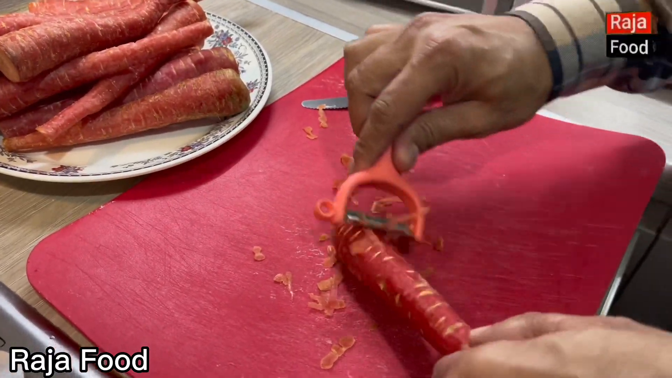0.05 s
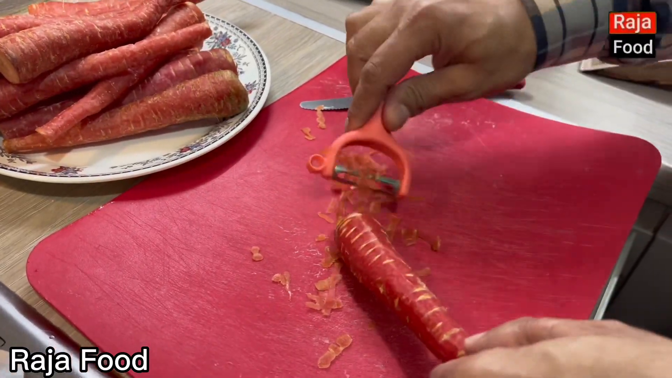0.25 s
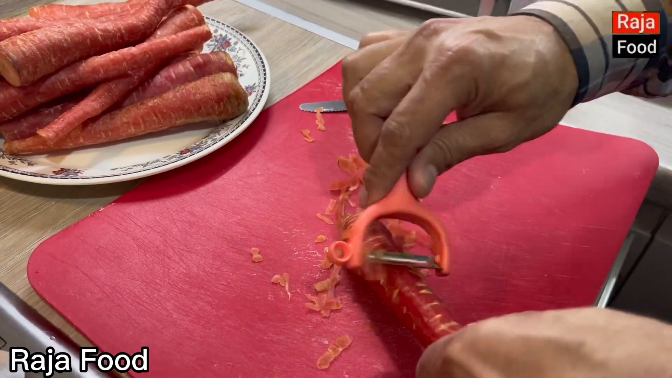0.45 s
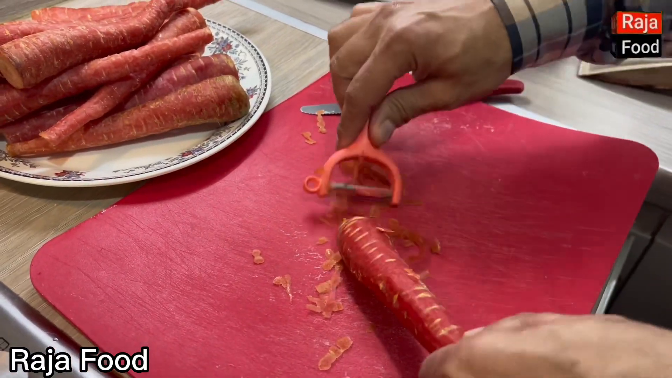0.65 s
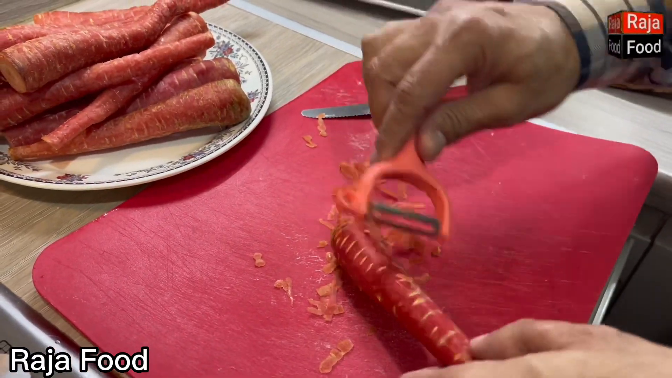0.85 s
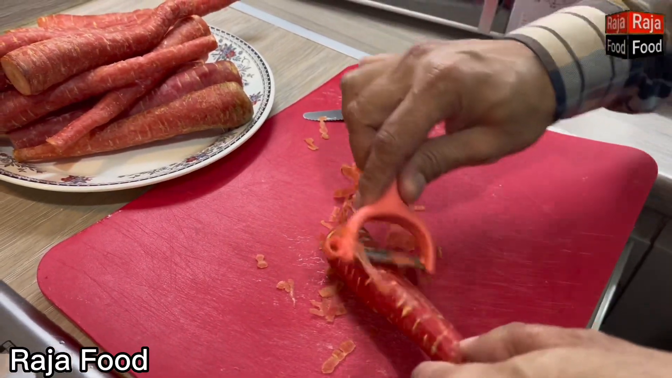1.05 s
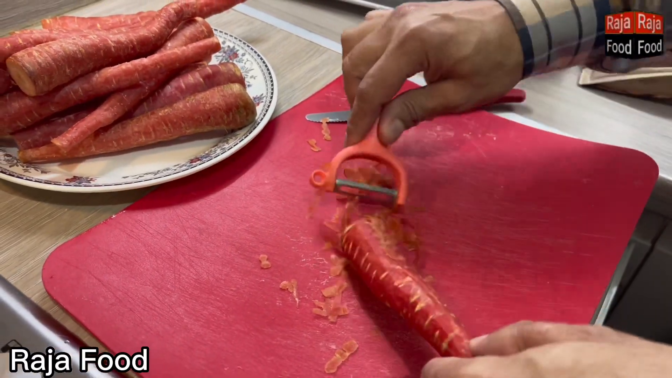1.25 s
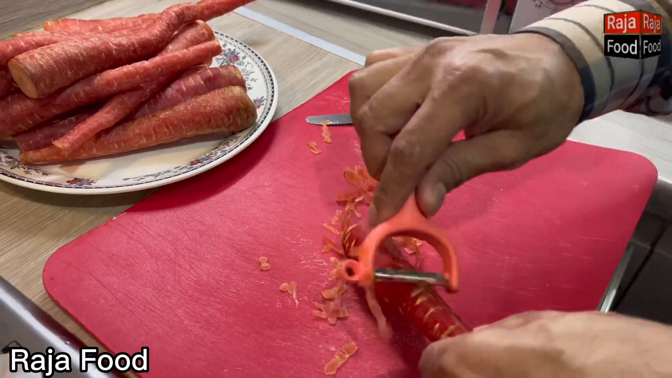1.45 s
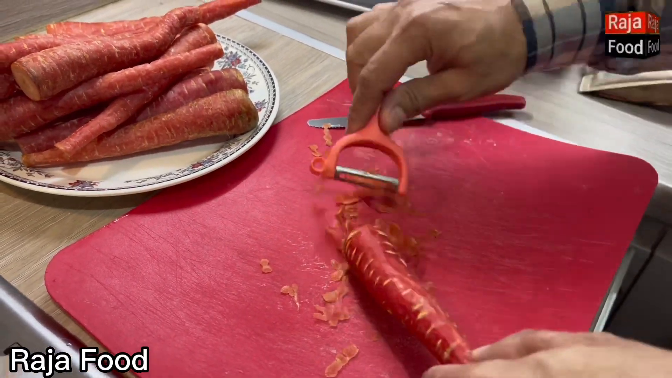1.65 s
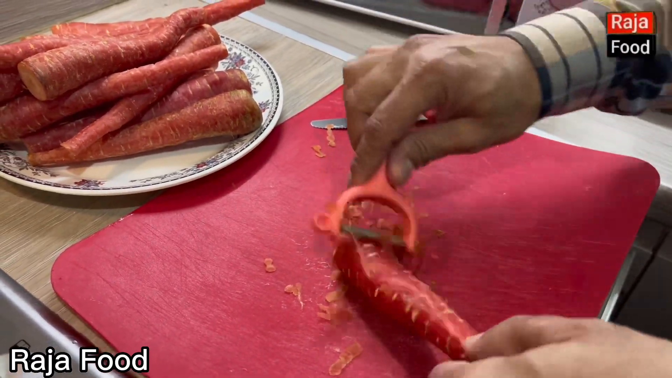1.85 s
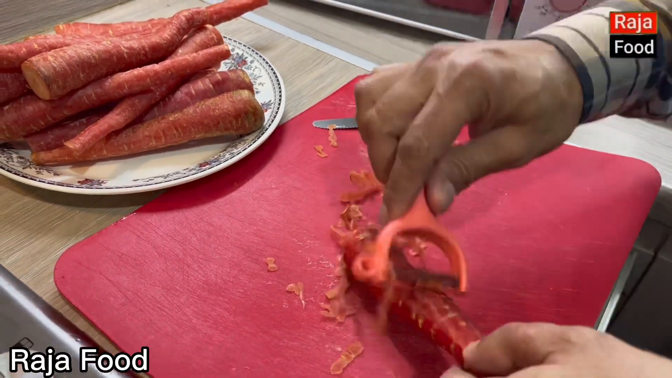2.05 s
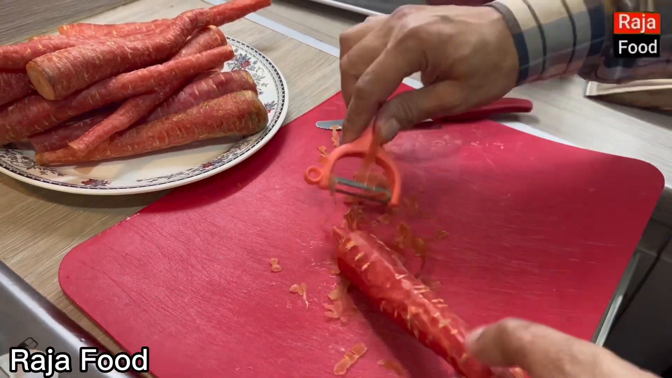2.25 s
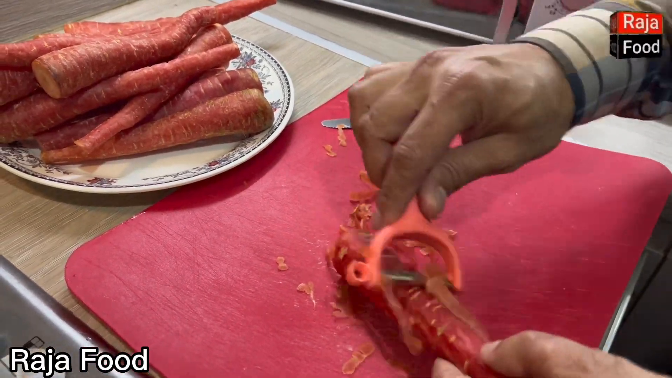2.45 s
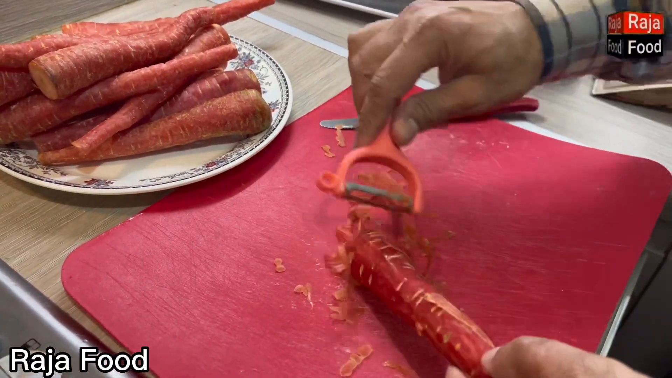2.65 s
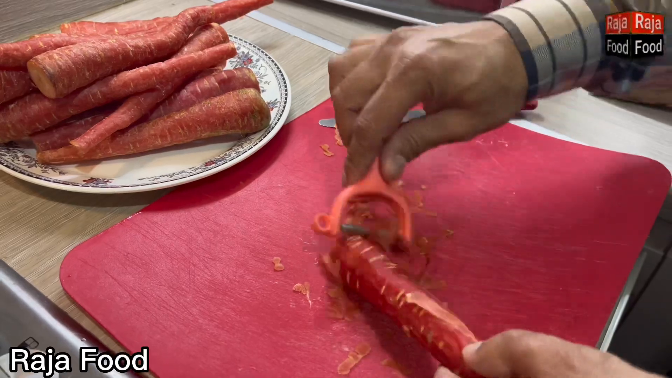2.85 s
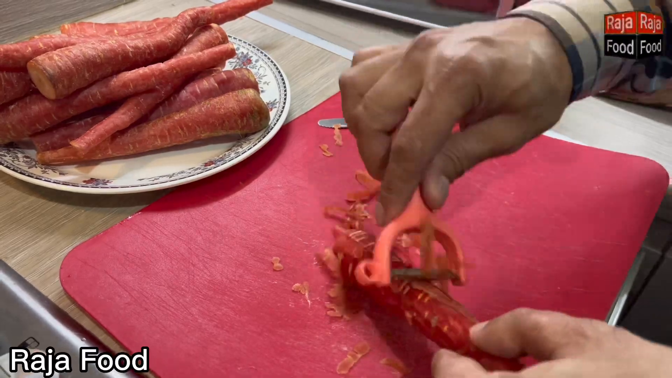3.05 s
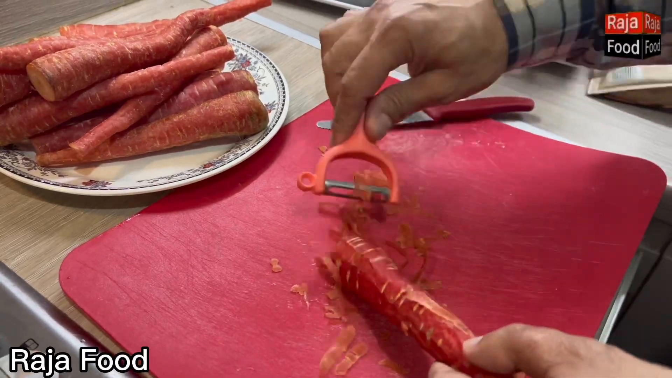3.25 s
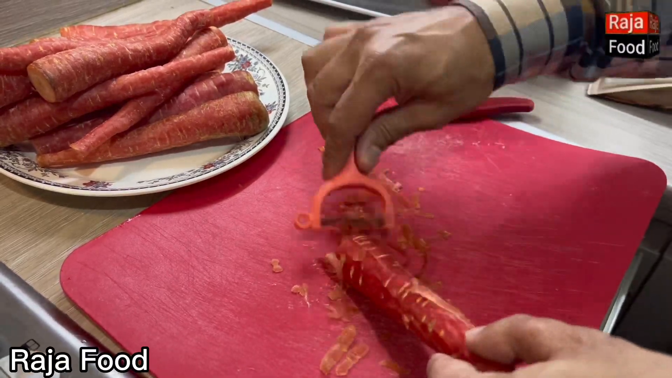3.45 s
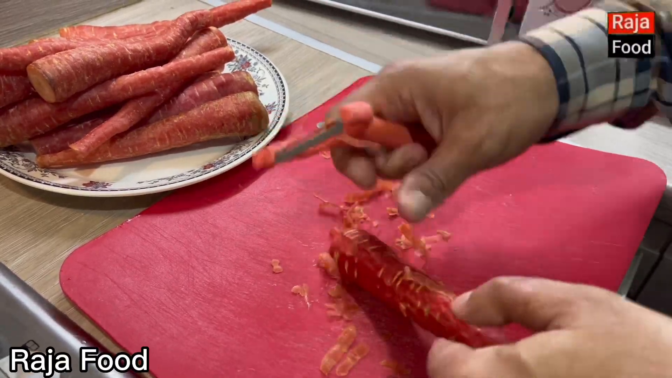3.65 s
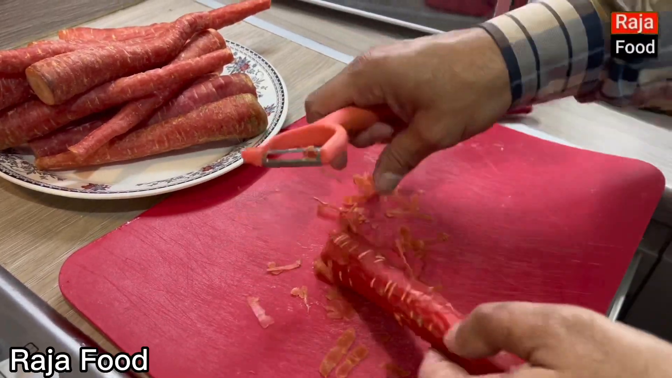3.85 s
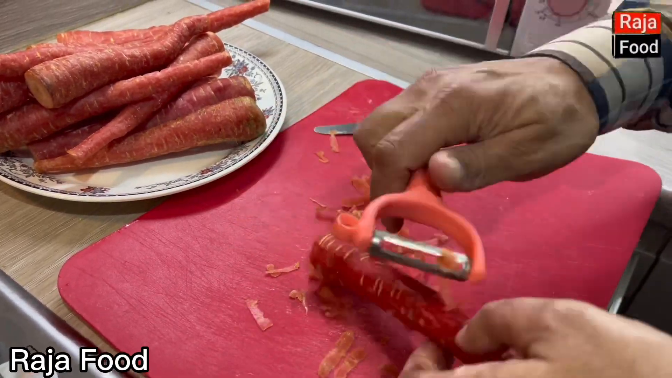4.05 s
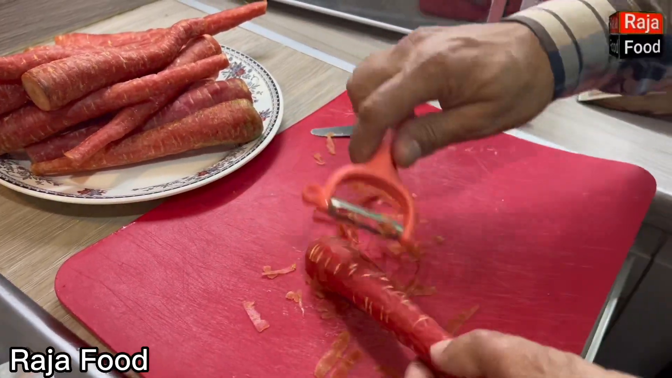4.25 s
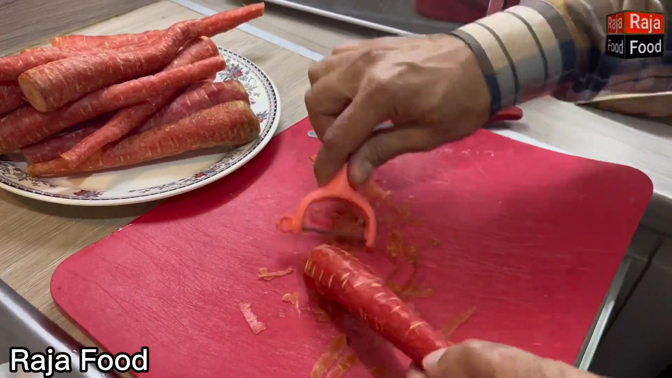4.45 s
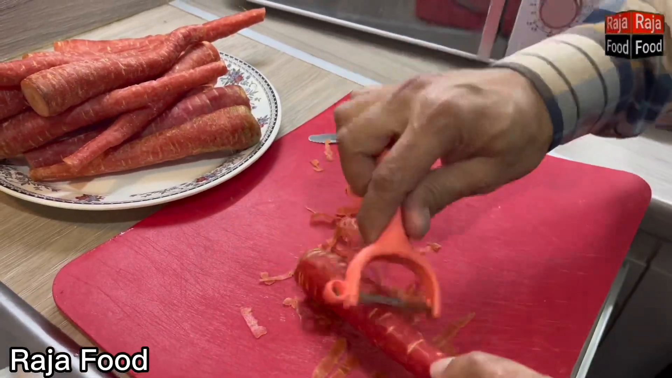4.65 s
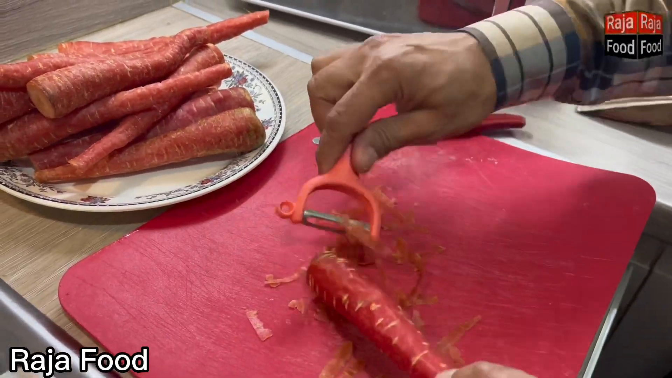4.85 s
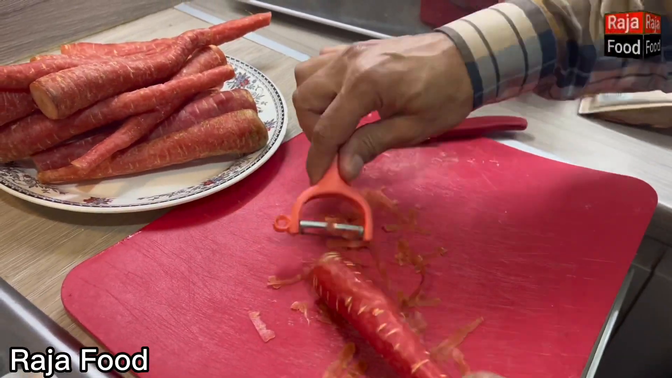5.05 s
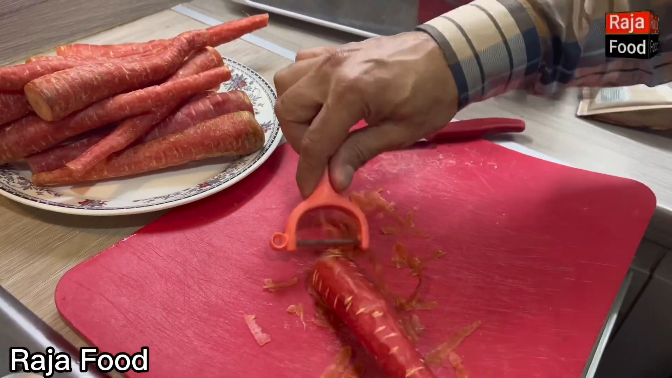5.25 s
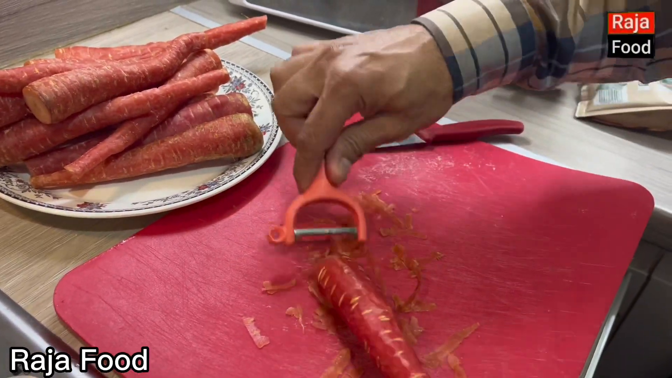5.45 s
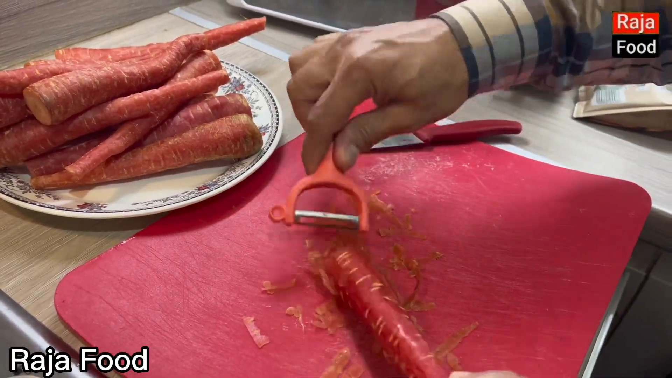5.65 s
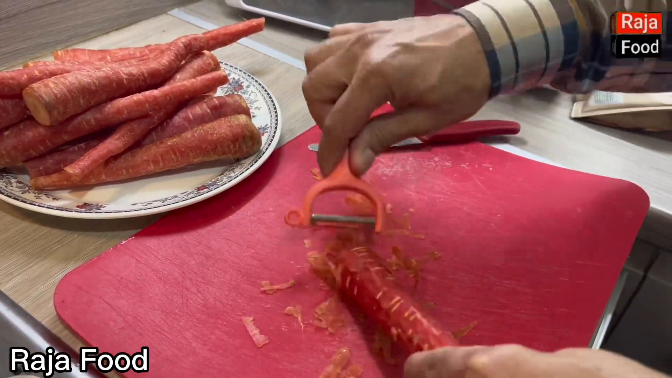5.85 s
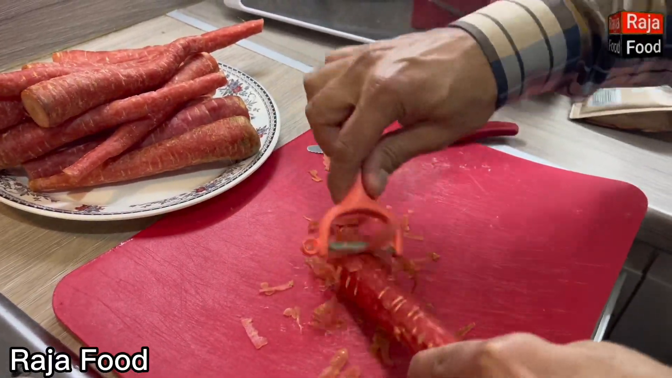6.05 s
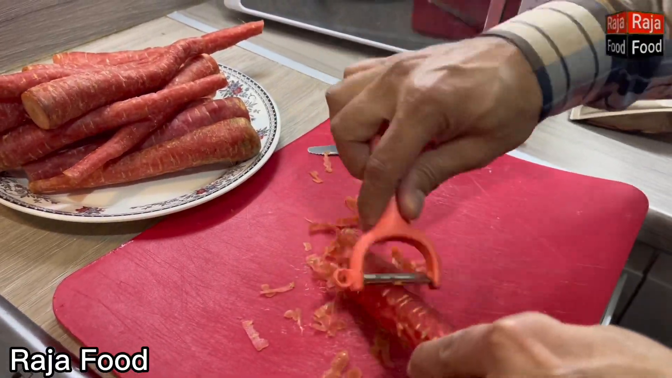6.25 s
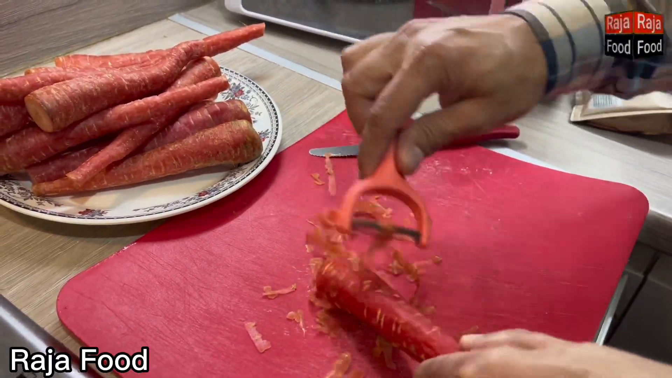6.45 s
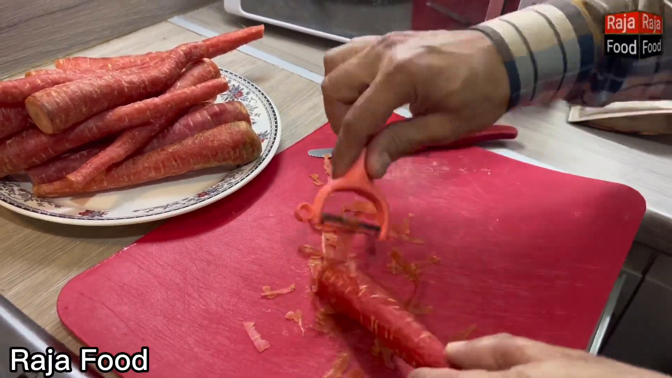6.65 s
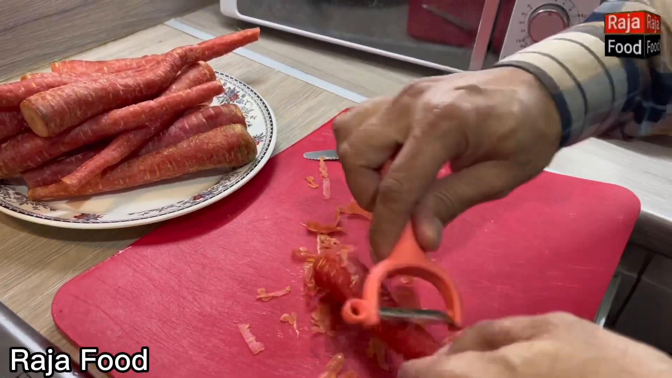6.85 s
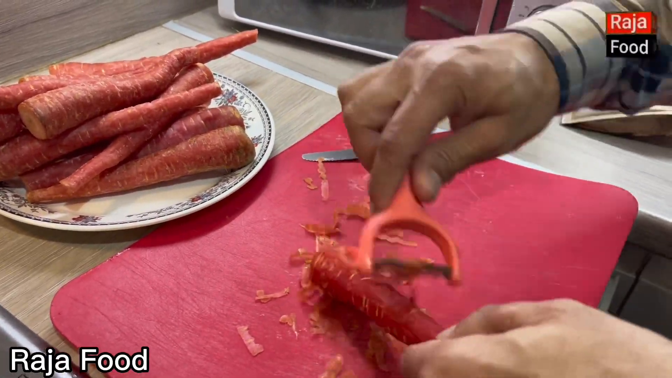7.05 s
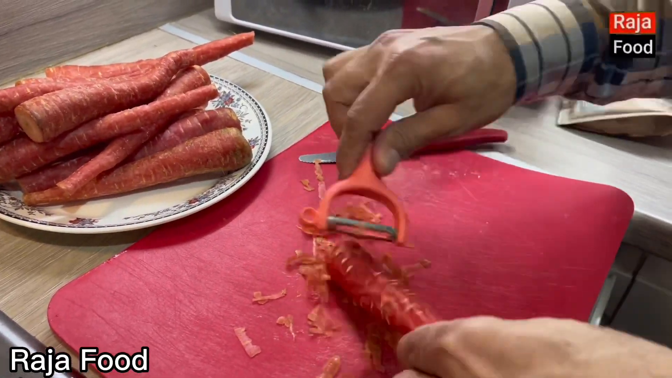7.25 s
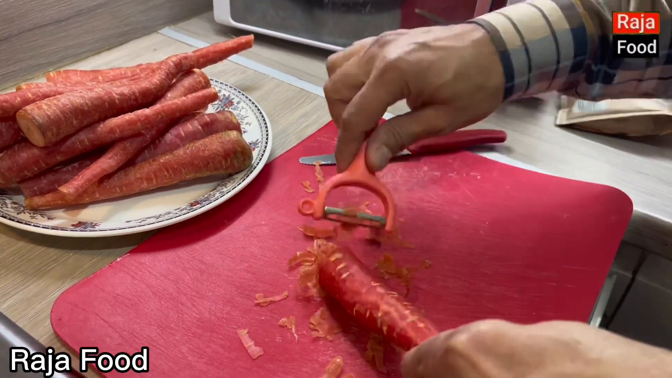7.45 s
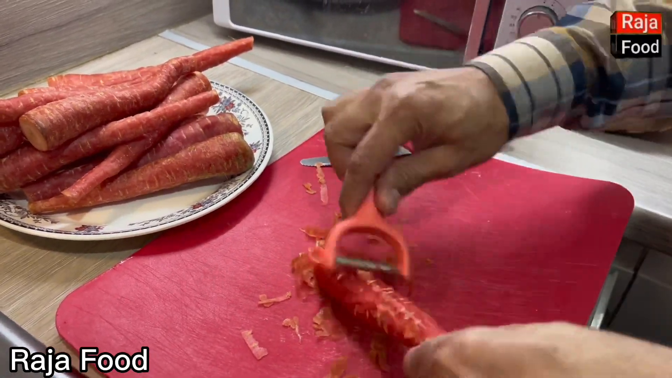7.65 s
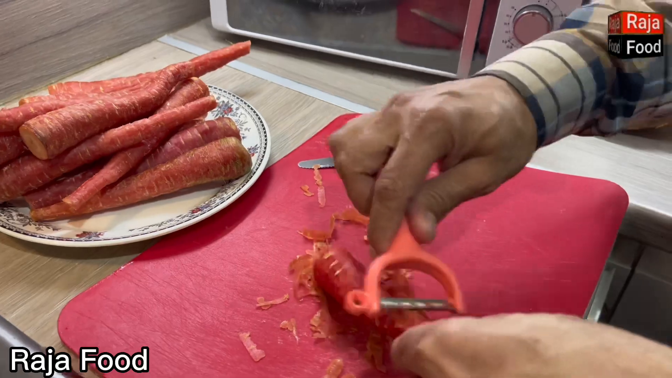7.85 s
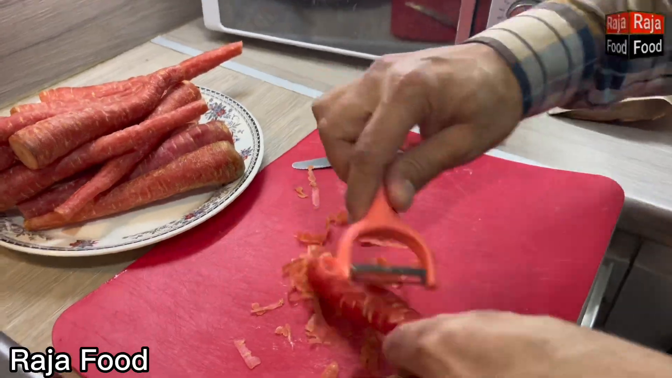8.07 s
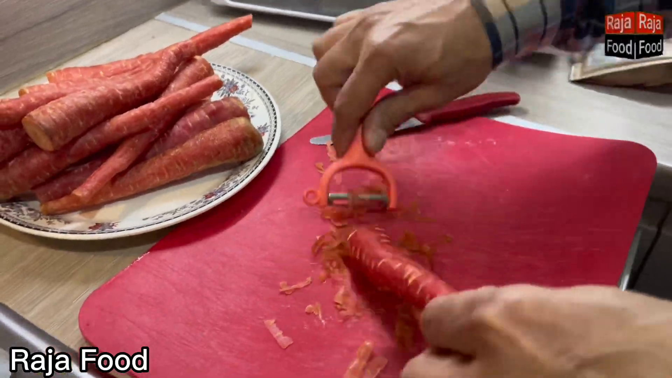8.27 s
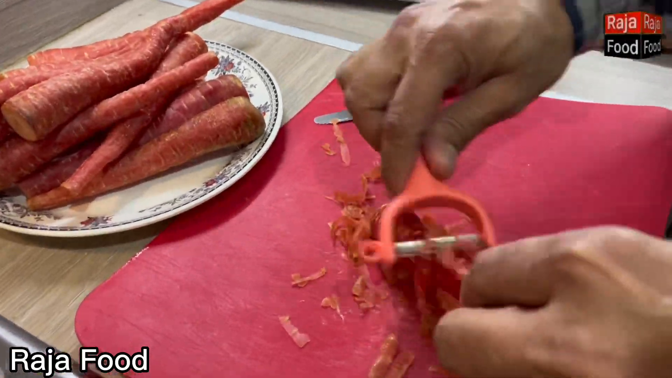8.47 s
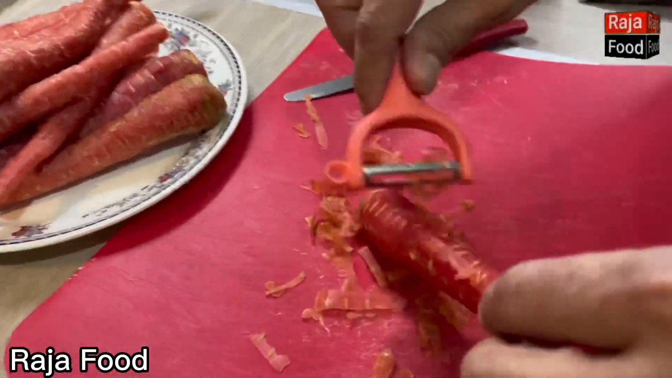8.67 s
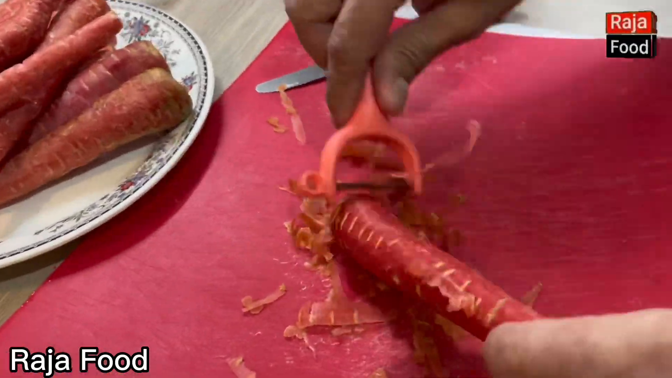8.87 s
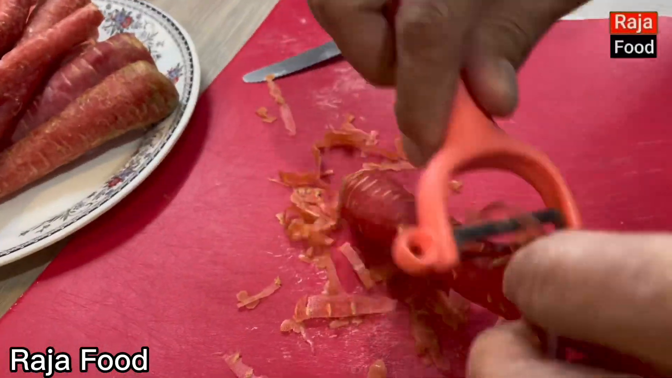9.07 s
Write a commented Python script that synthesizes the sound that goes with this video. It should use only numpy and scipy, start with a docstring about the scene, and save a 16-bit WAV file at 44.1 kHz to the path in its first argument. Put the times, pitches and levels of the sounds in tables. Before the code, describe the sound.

Close, crisp carrot peeling: short tearing scrapes, sharp blade clicks and low board thumps, pausing briefly midway, over faint unsteady room noise.

```python
"""A swivel peeler strips a carrot whose tip rests on a plastic cutting mat, close to a two-port phone in a kitchen.
Each stroke is noise shaped in loudness and colour: the blade bites, then tears through wet fibres.
Touches and flicks crack and ring the blade; the board hums, knocks and bumps under the carrot.
A small hard room adds short reflections. Behind it lies unsteady noise, with a low rumble at first.
Everything falls silent once, very briefly."""
import sys
import numpy as np
from scipy import signal
from scipy.fft import rfft, irfft, next_fast_len
from scipy.io import wavfile
from scipy.ndimage import uniform_filter1d

SR = 44100
rng = np.random.default_rng(int(sys.argv[2]) if len(sys.argv) > 2 else 0)


def waveform_to_disk(signal):
    """Save audio, clipped to [-1, 1], as 16-bit WAV at the path in sys.argv[1]."""
    frames = np.transpose(np.atleast_2d(signal))
    scaled = np.clip(frames, -1, 1) * 32767
    samples = np.round(scaled).astype(np.int16)
    wavfile.write(sys.argv[1], SR, samples)


N = 401971
T = np.arange(N) / SR  # time of every sample, s
SIZE = next_fast_len(N)
HZ = np.maximum(np.arange(SIZE // 2 + 1) * SR / SIZE, 1)  # every frequency of the spectrum


def undb(db):
    """Turn dB into a gain."""
    return 10 ** (np.asarray(db) / 20)


def unit(x):
    """Scale to an average strength (rms) of 1."""
    return x / np.sqrt(np.mean(x ** 2))


def across(table):
    """Read a (frequency [Hz], value) table at every frequency, on a logarithmic scale."""
    hz, value = np.transpose(table)
    return np.interp(np.log(HZ), np.log(hz), value)


def modes(table):
    """Add up damped resonators, every second one turned upside down."""
    total = 0
    for k, (hz, width_hz, db) in enumerate(table):
        detuning = (HZ ** 2 - hz ** 2) / (HZ * width_hz)
        total = total + (-1) ** k * undb(db) / (1 + 1j * detuning)
    return total


def through(x, response):
    """Filter a sound; white noise of rms 1 keeps rms 1."""
    filtered = irfft(rfft(x, SIZE) * response, SIZE)[..., :N]
    return filtered / np.sqrt(np.mean(np.abs(response) ** 2))


def walk(rate):
    """Glide between random levels, `rate` of them per second; spread 1."""
    step = int(SR / rate)
    levels = np.repeat(rng.standard_normal(N // step + 1), step)
    return unit(uniform_filter1d(levels, step)[:N])


def patches(shape, bins, frames):
    """Smooth random hills over frequency and time; spread 1."""
    hills = uniform_filter1d(rng.standard_normal(shape), bins, axis=0)
    return unit(uniform_filter1d(hills, frames, axis=1))


def shifting(x, broad_db, fine_db):
    """Let the colour wander: broad bands drift, narrow ones come and go."""
    spectra = signal.stft(x, nperseg=512, noverlap=384)[2]
    shape = spectra.shape[1:]
    gain = undb(broad_db * patches(shape, 25, 13) + fine_db * patches(shape, 2, 12))
    return signal.istft(spectra * unit(gain), nperseg=512, noverlap=384)[1][:, :N]


def grit(scatter_db, patchy_db, rate):
    """Dense snaps of uneven size, in patches as of stick and slip: one common set, then one per port."""
    size_db = scatter_db * rng.exponential(1, N) + patchy_db * walk(rate)
    return unit(rng.standard_normal((3, N)) * undb(size_db))


def blows(times, dbs, t60s, rises_s):
    """Add up the loudness of blows: a quick swell, then a fall of 60 dB in t60 seconds."""
    out = np.zeros(N)
    for s, db, t60, rise_s in zip(*np.broadcast_arrays(times, dbs, t60s, rises_s)):
        span = slice(max(int((s - 6 * rise_s) * SR), 0), int((s + 1) * SR))
        t = T[span] - s
        out[span] += undb(db - 60 * np.maximum(t, 0) / t60) / (1 + np.exp(-t / rise_s))
    return out


def slopes(t, rise_db_s, fall_db_s, hold_s=0):
    """A steady climb in dB to a peak at t = 0, a hold, a steady fall."""
    return rise_db_s * np.minimum(t, 0) - fall_db_s * np.maximum(t - hold_s, 0)


# How far the left port runs ahead: (frequency [Hz], phase lead [radians])
LEFT_LEAD = [(0, 0), (860, 0.9), (2580, 8.7), (5770, 18.0), (6370, 19.1), (8700, 18.8), (9820, 15.9),
             (10400, 15.7), (11800, 12.6), (12700, 12.6), (13400, 9.5), (14000, 9.6), (14700, 6.3),
             (15700, 6.3)]
# How much louder the left port is: (frequency [Hz], left minus right [dB])
LEFT_BALANCE = [(60, -21.5), (110, 3.5), (200, -9.5), (380, -8), (700, 6), (1290, -0.5), (2380, -5.5),
                (4400, -3), (8120, -1), (15000, 1.5)]
# Sound that reaches each port by its own path: (frequency [Hz], share [0-1])
OWN_PATH = [(300, 0.5), (1500, 0.75), (3000, 1), (6000, 0.65), (9000, 0.85), (12000, 0.2)]


def ports(x):
    """Both ports hear a common part with a lag and a balance, plus a part of their own treated alike."""
    lead = np.interp(HZ, *np.transpose(LEFT_LEAD))
    left = undb(across(LEFT_BALANCE) / 2) * np.exp(.5j * lead)  # the right port gets the opposite half
    own = across(OWN_PATH)
    spectra = rfft(x, SIZE)
    mixed = np.sqrt(1 - own ** 2) * spectra[0] + own * spectra[1:]
    return irfft(mixed * np.array([left, 1 / left]), SIZE)[:, :N]


ROOM_T60_S, ROOM_DB = 0.11, -9


def heard(envelope, response, snaps):
    """A source straight into the ports, plus wall reflections as smooth noise that dies away."""
    fall = undb(-120 / ROOM_T60_S / SR)  # acts on energy, so 60 dB in ROOM_T60_S
    energy = signal.lfilter([1 - fall], [1, -fall], envelope ** 2)
    wet = undb(ROOM_DB) * np.sqrt(energy)
    direct = ports(through(envelope * snaps, response))
    return direct + through(wet * rng.standard_normal((2, N)), response)


# Colour of the steady background: (frequency [Hz], relative level [dB per Hz])
AIR_COLOUR = [(15, -35), (25, 7), (81, 14), (250, 0), (928, -3), (2130, -9), (6190, -17), (9890, -20),
              (11300, -21), (12500, -26), (16200, -56.5), (22000, -120)]
AIR_DB, RUMBLE_DB, RUMBLE_STOP_S = -75.5, -68, 1.5


def kitchen():
    """Unsteady air and appliance noise, with a low resonant rumble that stops early on."""
    shared, own = rng.standard_normal((2, N)), rng.standard_normal((2, 2, N))
    air, low = .8 * shared[:, None] + .6 * own  # partly alike on the left and right
    air = shifting(through(air, undb(across(AIR_COLOUR))), 3.4, 3.3)
    air = undb(AIR_DB + 3.0 * walk(13)) * air
    low = through(low, modes([(78.4, 23, -2), (490, 760, -22.0)]))  # (Hz, width Hz, dB)
    rumble = undb(RUMBLE_DB + 3.5 * walk(12)) * low * (T < RUMBLE_STOP_S)
    return air + rumble


# Knocks and scuffs of the carrot on the board: (time [s], level [dB], swell [ms])
CARROT_KNOCKS = [(0.12, -34, 1.8), (0.622, -36, 0.84), (1.598, -24.5, 3), (1.927, -46.5, 1.2),
                 (2.222, -36, 3.7), (2.581, -29.5, 0.25), (3.564, -67, 3), (4.08, -60.5, 4),
                 (4.499, -45, 5), (4.802, -43.5, 1.1), (4.915, -60, 0.88), (5.304, -61, 4.2),
                 (6.5, -55, 2.4), (6.752, -63, 3.8), (7.182, -62, 3), (7.299, -53.5, 4.5),
                 (7.376, -49, 2.5), (7.539, -54.5, 3.5), (7.939, -52, 4), (8.616, -46.5, 5.4),
                 (8.822, -48.5, 2.7)]
# Dull bumps as the hand shifts the carrot: (time [s], level [dB])
HAND_BUMPS = [(1.699, -62.5), (2.017, -56), (2.707, -66), (3.29, -70), (4.21, -75), (4.614, -62),
              (8.949, -57)]
# Resonances of the struck board: (frequency [Hz], width [Hz], level [dB])
STRUCK_BOARD = [(300, 53, 9), (764, 190, 8.5), (1339, 210, 17.5), (1570, 85, -10), (2160, 350, 3),
                (3820, 170, 6.5), (4310, 440, -3.5)]
KNOCK_T60_S, SNAP_DB = .09, 0.5
BUMP_T60_S, BUMP_SWELL_S, BUMP_TOP_HZ = 0.13, 0.0055, 790


def knocks_and_bumps():
    """Blows excite the board; a quicker swell starts with a harder crack, and bumps lose their treble."""
    s, db, swell_ms = np.transpose(CARROT_KNOCKS)
    knock = blows(s, db, KNOCK_T60_S, swell_ms / 1000)
    knock += blows(s, db + SNAP_DB - 20 * np.log10(swell_ms / .3), .006, .0002)
    bump = blows(*np.transpose(HAND_BUMPS), BUMP_T60_S, BUMP_SWELL_S)
    board = modes(STRUCK_BOARD)
    dull_board = board / (1 + 1j * HZ / BUMP_TOP_HZ) ** 3
    snaps = grit(1.5, 1.7, 400)
    return heard(knock, board, snaps) + heard(bump, dull_board, snaps)


# Pulls of the blade, and lighter brushes while the carrot is turned:
# (bite time [s], bite level [dB], wait before the cut [s], cut length [s], tearing level [dB],
#  swell over the cut [dB], board hum level [dB], hum crest as share of the cut [0-1])
PULLS = [(0.0, -36, .001, 0.15, -39, -5, -40.5, 0.74), (0.407, -40.5, 0.055, .15, -39, 5.5, -45, .6),
         (0.968, -52, 0.023, 0.16, -39, -0.5, -44, 0.68), (1.446, -51, 0.038, .12, -38, 18, -45.5, 0.8),
         (1.831, -35.5, 0.035, 0.052, -42.5, -1, -63.5, 0.38),
         (2.087, -47.5, 0.058, 0.086, -42.5, 2.1, -50, 0.56),
         (2.43, -40.5, 0.044, 0.11, -39.5, -2, -47.5, 0.67),
         (2.774, -42, 0.042, 0.066, -39, 6.5, -50.5, 0.73), (3.074, -52, 0.05, 0.08, -41.5, 1, -52, 0.55),
         (3.395, -40, 0.031, 0.05, -38.5, 8.5, -49, 0.5), (3.558, -80, 0.015, 0.085, -61.5, -4, -69, 0),
         (3.769, -55.5, .02, 0.054, -62, 7, -88, .55), (4.018, -66, 0.0089, 0.054, -67, 7, -82, .9),
         (4.194, -81, .015, 0.018, -71, -1, -79, .55), (4.34, -43, 0.068, 0.092, -40, -1, -51, 0.63),
         (4.697, -35, .04, 0.055, -40.5, 0, -53.5, 0.57),
         (4.957, -41, 0.014, 0.067, -42, 21.5, -45.5, 0.59),
         (5.185, -47, 0.034, 0.053, -39.5, 3.5, -45, 0.4),
         (5.402, -37.5, 0.031, 0.046, -42, -2, -45.5, 0.08), (5.598, -35.5, 0.024, 0.033, -44, -7, -50, 0),
         (5.808, -48, 0.019, 0.046, -42, -0.5, -50.5, 0.17), (6.006, -39, 0.023, 0.072, -38, 8, -47, 0.72),
         (6.218, -49.5, .11, 0.022, -41, 7, -55, 0.1), (6.566, -42.5, 0.046, 0.044, -56.5, -2, -63.5, 0.27),
         (6.689, -66, .02, 0.1, -67.5, 0, -89, .55), (6.842, -48.5, 0.083, 0.044, -45, 10, -56.5, 0.4),
         (7.128, -41.5, 0.046, 0.051, -45, .1, -57.5, 0.35),
         (7.273, -51.5, 0.0075, 0.028, -59, -8, -86, 0.6), (7.375, -39.5, 0.021, .03, -53, -3, -51, 0.4),
         (7.439, -55, 0.013, 0.034, -52.5, 5, -81, 0), (7.602, -39, 0.036, 0.05, -44.5, 2.5, -55.5, 0.52),
         (7.841, -39.5, 0.074, 0.053, -43, 3.5, -54.5, 0.24),
         (8.128, -40.5, 0.049, 0.093, -41, 2.5, -57, 0.84), (8.436, -44, 0.049, 0.089, -38, 0, -55.5, 0.29),
         (8.772, -42.5, 0.055, 0.075, -39, 1, -59.5, 0.44), (9.106, -40, 0.026, .01, -56, .1, -76, 0.3)]
BITE_RISE_DB_S, BITE_FALL_DB_S = 1301.5, 375
CUT_RISE_DB_S, CUT_FALL_DB_S = 322, 421.5
ARCH_DB = 7  # how far both ends of a cut lie below its middle, before the swell
TRAIL_DB, TRAIL_FALL_DB_S = -27, 201  # the peel drags off after the cut; level relative to the tearing
# The hum is 6 dB down this far before its crest: a fixed time plus a share of the cut; it falls quicker
HUM_WIDTH_S, HUM_WIDTH_SHARE, HUM_FALL_SHARE = 0.021, 0.23, 0.83


def strokes():
    """Loudness of tearing and hum: a bite, an easing, an arched cut; the board hums up to one crest."""
    tear_energy, hum = np.zeros(N), np.zeros(N)
    for s, bite_db, wait_s, cut_s, tear_db, swell_db, hum_db, crest in PULLS:
        span = slice(max(int((s - .2) * SR), 0), int((s + .6) * SR))
        t = T[span] - s - wait_s  # time since the cut began
        along = np.clip(t / cut_s, 0, 1) - .5
        arch_db = swell_db * along - ARCH_DB * (2 * along) ** 2
        bite = bite_db + slopes(t + wait_s, BITE_RISE_DB_S, BITE_FALL_DB_S)
        cut = tear_db + arch_db + slopes(t, CUT_RISE_DB_S, CUT_FALL_DB_S, cut_s)
        trail = tear_db + TRAIL_DB + slopes(t, BITE_RISE_DB_S, TRAIL_FALL_DB_S, cut_s)
        for part_db in (bite, cut, trail):
            tear_energy[span] += undb(part_db) ** 2
        off = (t - crest * cut_s) / (HUM_WIDTH_S + HUM_WIDTH_SHARE * cut_s)
        off = np.where(off > 0, off / HUM_FALL_SHARE, off)
        hum[span] += undb(hum_db - 6 * off ** 2)
    return np.sqrt(tear_energy), hum


# Resonances of the board under the carrot: (frequency [Hz], width [Hz], level before squaring [dB])
HUMMING_BOARD = [(137.5, 38, -5.5), (222.4, 62.5, -5), (317.6, 76, -2), (543, 66, -12), (802, 218, -9),
                 (1304, 120, -12)]


def board_hum():
    """The pressed carrot drives the board with rough noise; squaring the resonances sharpens them."""
    return heard(strokes()[1], modes(HUMMING_BOARD) ** 2, grit(1.5, 2.5, 40))


# Resonances of frame and blade: (frequency [Hz], width [Hz], level [dB])
PEELER_MODES = [(2130, 350, -2), (4310, 410, 10), (6260, 1500, -2), (6400, 210, -9.5), (10960, 1200, 6.5)]


def frame():
    """The peeler passes the sound on directly and adds its own resonances."""
    return 1 + modes(PEELER_MODES)


# Colour of tearing fibres: (frequency [Hz], relative level [dB per Hz])
FIBRE_COLOUR = [(700, -17.5), (1400, -14.5), (2200, -2), (3200, -6), (6000, -7), (8500, -12.5), (11000, -6),
                (12400, -17), (13300, -52.5), (16000, -42)]


def tearing():
    """Wet fibres snap densely along each stroke and sound through the peeler."""
    return heard(strokes()[0], undb(across(FIBRE_COLOUR)) * frame(), grit(1.3, 2.0, 150))


# Blade touches, bites and flicks: (time [s], crack level [dB], blade ring minus crack [dB])
BLADE_HITS = [(.118, -31, -8), (0.168, -35, 0), (0.4002, -35, 4), (.576, -31, -2), (0.659, -33, 2.5),
              (0.9302, -33, -11), (0.949, -21, -12), (1.1154, -36.5, 14.5), (1.1795, -33, -12),
              (1.457, -26, -26), (1.479, -32.5, -13), (1.507, -42, -8), (1.8032, -38.5, 3.5),
              (1.8203, -29, 7), (1.922, -34.5, 2), (2.087, -40.5, -19), (2.252, -42, -1), (2.316, -67, -14),
              (2.426, -38.5, -8), (2.5815, -35, -19), (2.604, -43.5, 6), (2.77, -46, -11),
              (2.7785, -33, -19), (3.0706, -45.5, -5), (3.083, -35, 2), (3.381, -40, -18),
              (3.3937, -52, -11), (3.499, -38, -1), (3.639, -43.5, -6), (3.764, -54, -20),
              (3.8394, -47, -18), (3.91, -66, 7), (4.0187, -58, -21), (4.067, -51.5, -22),
              (4.186, -70, -7.5), (4.33, -42, -13), (4.345, -24.5, -9), (4.4133, -34.5, -18),
              (4.5125, -38.5, -4), (4.6763, -37.5, -7), (4.6874, -25.5, -19), (4.954, -42, -25),
              (5.187, -36, -24), (5.387, -36, -13), (5.4047, -24.5, -27), (5.488, -37, 10.5),
              (5.582, -44.5, -11), (5.602, -24, -24), (5.6782, -38.5, 13), (5.7758, -52.5, -13),
              (5.803, -38, -14), (5.8745, -31, 4.5), (5.9858, -34.5, -10), (5.9994, -26, -4),
              (6.129, -38, 10.5), (6.225, -39, -16.5), (6.281, -33.5, -19), (6.5545, -38, -2),
              (6.57, -28.5, -11), (6.7044, -50, -12), (6.831, -46, 1), (6.8424, -30, -4), (6.999, -40, -4),
              (7.128, -32.5, -10), (7.2726, -44, -19), (7.375, -34.5, -15), (7.45, -40.5, -12),
              (7.555, -64, -6), (7.6024, -38, -14), (7.744, -52.5, -17), (7.8406, -38, -2),
              (7.925, -55, 19), (8.0034, -49.5, 0), (8.122, -40, -3), (8.1355, -33, -2), (8.2854, -43, 3),
              (8.361, -73, -2.5), (8.4237, -36.5, -11.5), (8.437, -27.5, -25), (8.6114, -41, 6),
              (8.7557, -42, -0.5), (8.775, -34, 8.5), (8.8168, -44, 13), (8.9215, -39.5, 5.5),
              (9.0416, -63, -23), (9.1062, -31, -17)]
# Colour of bites and flicks: (frequency [Hz], relative level [dB per Hz])
CRACK_COLOUR = [(700, -20), (1500, -14), (3000, -4), (6000, -0.5), (9000, -6.5), (12000, -11.5),
                (13300, -57.5), (16000, -57)]
TOUCH_GAP_S = .025  # a hit this close before another is a soft first touch
TOUCH_SWELL_S, CRACK_SWELL_S = .002, 0.0013
CRACK_T60_S, GLINT_DB, GLINT_T60_S, RING_T60_S = 0.057, -3.5, 0.021, 0.011
RING_HZ, RING_WIDTH_HZ = 11230, 45


def hits():
    """Each hit cracks through the peeler, glints brightly and rings the blade; returns cracks, ring."""
    s, db, ring_db = np.transpose(BLADE_HITS)
    touch = np.diff(s, append=np.inf) < TOUCH_GAP_S
    crack = blows(s, db, CRACK_T60_S, np.where(touch, TOUCH_SWELL_S, CRACK_SWELL_S))
    # the more a hit rings the blade, the stronger its sharp, bright glint
    glint = blows(s, db + .6 * ring_db + GLINT_DB, GLINT_T60_S, np.where(touch, TOUCH_SWELL_S, .0004))
    ring = blows(s, db + ring_db, RING_T60_S, 0.00033)
    bright = modes([(9400, 3400, 0)]) ** 2 * undb(across(FIBRE_COLOUR))  # (Hz, width Hz, dB)
    cracks = heard(crack, undb(across(CRACK_COLOUR)) * frame(), grit(2.0, 2.3, 500))
    cracks += heard(glint, bright, grit(2.5, 1.5, 350))
    return cracks, heard(ring, modes([(RING_HZ, RING_WIDTH_HZ, 0)]), grit(2.2, .9, 370))


def blade():
    """Changing contact and angle shift the colour of tearing and cracks; the ring keeps its pitch."""
    cracks, ring = hits()
    return shifting(tearing() + cracks, 2.21, 4.16) + ring


def scene():
    """The peeler at work on the board, over the kitchen's background noise."""
    return kitchen() + knocks_and_bumps() + board_hum() + blade()


SILENCE_START_S, SILENCE_END_S = 1.398, 1.434
TOP_HZ = 16000


def record(dry):
    """Everything falls silent briefly, with soft edges; then the phone cuts the top."""
    silent = 1. * (T > SILENCE_START_S) * (T < SILENCE_END_S)
    level = 1 - uniform_filter1d(silent, size=88)
    top_cut = signal.ellip(8, .2, 70, TOP_HZ, fs=SR, output="sos")
    return signal.sosfilt(top_cut, dry * level)


dry = scene()
out = record(dry)
waveform_to_disk(out)
```